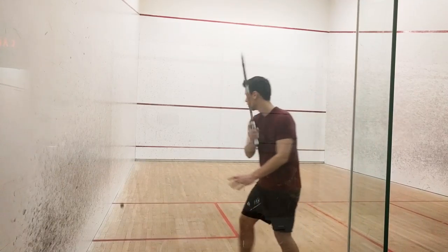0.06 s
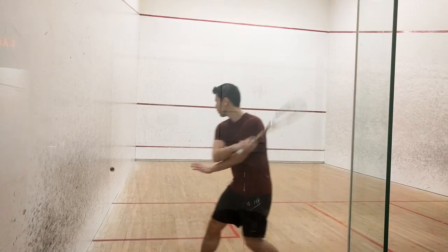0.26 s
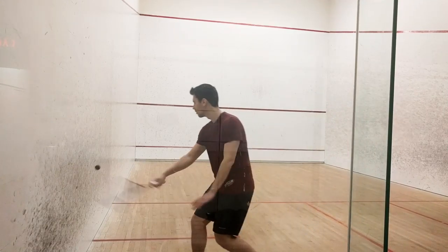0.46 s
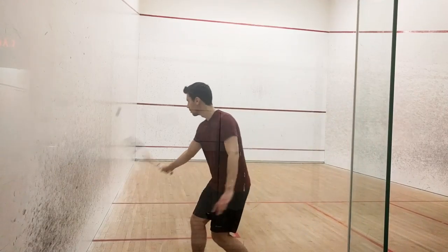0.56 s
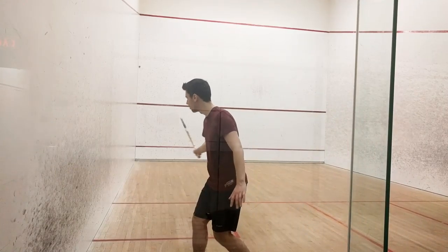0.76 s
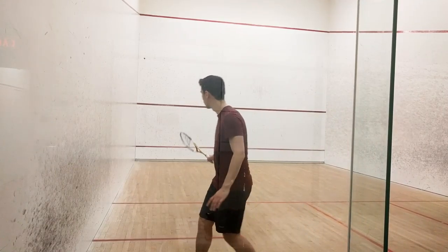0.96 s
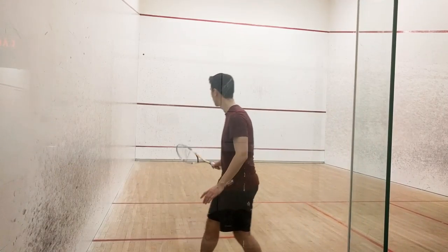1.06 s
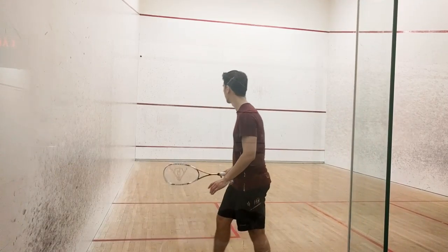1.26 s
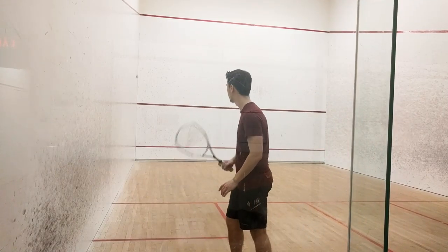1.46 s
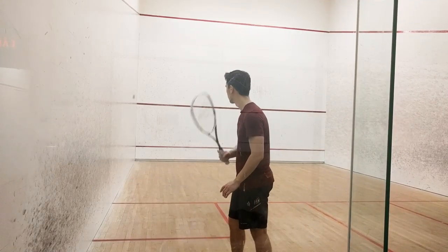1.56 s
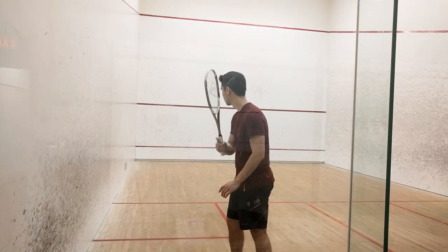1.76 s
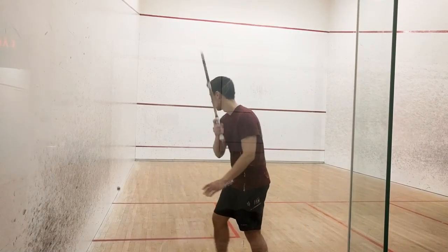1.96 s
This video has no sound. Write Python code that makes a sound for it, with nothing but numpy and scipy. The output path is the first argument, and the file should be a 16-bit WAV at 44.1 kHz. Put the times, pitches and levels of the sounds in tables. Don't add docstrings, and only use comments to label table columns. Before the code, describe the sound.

Squash ball hits in a bare closed court: floor bounce, racket crack, loud wall smack, ringing echoes

```python
import sys
import numpy as np
from scipy import signal
from scipy.fft import rfft, irfft
from scipy.io import wavfile

SR = 44100
rng = np.random.default_rng(int(sys.argv[2]) if len(sys.argv) > 2 else 0)


def put_to_file(sound):
    columns = np.atleast_2d(sound).T
    safe = np.clip(columns, -1, 1)
    whole_steps = np.round(safe * 32767)
    wavfile.write(sys.argv[1], SR, whole_steps.astype(np.int16))


def invert_db(level):
    return 10 ** (np.asarray(level, dtype=float) / 20)


N = 88200
COURT_TOP_HZ = 15750

# (pitch [Hz], level [dB], time to fade by 60 dB [s])
FLOOR_THUMP = [(183, 6, 0.029), (450, -18, 0.037), (740, -4, 0.0089), (1330, -6, 0.03)]
# modes (pitch [Hz], level [dB], time to fade by 60 dB [s]),
# then scrape length [s], scrape level [dB], scrape top [Hz], rattle fade by 60 dB [s], rattle level [dB]
SOLE_SNAP = ([(1020, -12, .01), (1920, -18, 0.0088), (3240, -5, 0.026), (4650, -19, .01)],
              0.001, -14, 3000, .02, -28)


def level(x, db):
    return x * invert_db(db) / np.sqrt(np.mean(x ** 2))


def table(points, hz):
    p = np.array(points, float)
    return np.interp(np.log(np.maximum(hz, 1)), np.log(p[:, 0]), p[:, 1])


def colour(x, gain):
    return irfft(rfft(x) * gain(np.fft.rfftfreq(len(x), 1 / SR)), len(x))


def dull(x, top_hz):
    return signal.lfilter(*signal.butter(2, min(top_hz, .45 * SR), fs=SR), x)


def flutter(t):
    patch_db, patches_per_s = 3, 70
    wobble = np.interp(t * patches_per_s, np.arange(400), rng.standard_normal(400))
    return invert_db(patch_db * wobble - .5)


def ring(modes, detune, wave):
    t = np.arange(SR // 10) / SR
    y = 0
    for (hz, db, t60), d in zip(modes, detune):
        y = y - invert_db(db - 60 * t / t60) * wave(2 * np.pi * hz * d * t)
    return y / np.abs(y).max()


def impact(arrivals, body, crack):
    push_s, crack_rise_s = .0008, 0.00011
    echo_blur, echo_top_hz = 1.98, 13300
    modes, scrape_s, scrape_db, top_hz, rattle_t60, rattle_db = crack
    out = np.zeros(N + SR)
    t = np.arange(SR // 10) / SR
    for k, (s, thump_db, crack_db) in enumerate(arrivals):
        is_echo = k > 0
        blur = echo_blur if is_echo else 1
        detune = 1 + 0.012 * is_echo * rng.standard_normal(12)

        push = np.sin(np.pi * np.clip(t[:441] / (push_s * blur), 0, 1)) ** 2
        thump = np.convolve(ring(body, detune, np.cos), push / push.sum())[:len(t)]

        scrape = invert_db(scrape_db) * np.exp(-(t / (scrape_s * blur) - 1) ** 2) * (t > 0)
        rattle = invert_db(rattle_db - 60 * t / rattle_t60)
        noise = dull(rng.standard_normal(len(t)), top_hz) * (scrape + rattle)
        tones = ring(modes, detune[4:], np.sin) * (1 - np.exp(-t / crack_rise_s)) / blur
        snap = tones + noise
        if is_echo:
            snap = dull(snap, echo_top_hz)

        i = int((s - push_s * blur / 2) * SR)
        j = int((s - scrape_s) * SR)
        out[i:i + len(t)] += invert_db(thump_db) * thump
        out[j:j + len(t)] += invert_db(crack_db) * snap
    return out[:N]


def floor_bounce():
    # (time [s], thump level [dB], crack level [dB])
    arrivals = [(.1168, -14, -23.5), (.1179, -18.5, -36), (.1318, -19, -38), (.152, -36, -37),
                (.1635, -26, -39), (.1705, -23, -47), (.1795, -18, -42), (.1925, -19.5, -43),
                (.2015, -37, -58), (.215, -30, -37), (.229, -25, -48), (.253, -41, -41), (.277, -37, -46)]
    # [Hz, dB, s]
    snap = ([(1140, -8, 0.0077), (1640, 2, 0.0047), (3070, -25, .004), (4140, -3, 0.0043),
             (8550, -10, 0.0064), (12000, -8, .004), (14900, -10, 0.0038)], 0.0008, -7, 4900, 0.059, -19)
    return impact(arrivals, FLOOR_THUMP, snap)


def floor_nick():
    # (time [s], thump level [dB], crack level [dB])
    arrivals = [
        (.1412, -36, -24.5),
    ]
    # [Hz, dB, s]
    snap = ([(2160, 11.5, 0.0078), (2960, -2, 0.0056), (4880, 2, 0.0079), (8000, -8, 0.0036),
             (12500, -15, .003)], 0.00041, -17, 10000, 0.0099, -18)
    return impact(arrivals, FLOOR_THUMP, snap)


def back_wall_touch():
    # (time [s], thump level [dB], crack level [dB])
    arrivals = [
        (.3964, -25.5, -47),
        (.404, -29, -54),
        (.4235, -20, -61),
    ]
    # (pitch [Hz], level [dB], time to fade by 60 dB [s])
    body = [(296, -8, 0.013), (660, -6, 0.017), (1010, -1, 0.025)]
    return impact(arrivals, body, SOLE_SNAP)


def racket_drive():
    # (time [s], thump level [dB], crack level [dB])
    arrivals = [(.6296, -11.5, -29), (.6365, -45, -38), (.6525, -17.5, -37.5), (.657, -22, -43),
                (.671, -43, -41), (.677, -42, -43), (.683, -35, -44), (.6925, -16, -45), (.698, -36, -38),
                (.7035, -38, -46), (.7155, -30, -47), (.745, -37, -47), (.758, -34, -49),
                (.788, -52, -54.5), (.821, -43, -53), (.908, -30, -57)]
    # (pitch [Hz], level [dB], time to fade by 60 dB [s])
    body = [(300, -1.5, 0.025), (1000, -7.5, 0.04), (1300, -11, 0.035), (1610, -11.5, 0.013)]
    # [Hz, dB, s]
    snap = ([(3360, -10, 0.0049), (4900, 7, 0.009), (5830, -10, 0.011), (8800, 4, 0.01), (9550, -15, .006),
             (13500, -1, 0.0092)], 0.0009, -14.5, 10800, 0.04, -2.5)
    return impact(arrivals, body, snap)


def front_wall_smack():
    # (time [s], thump level [dB], crack level [dB])
    arrivals = [(1.0768, -6.5, -7.5), (1.0845, -34, -13), (1.0855, -10, -23), (1.0925, -27, -38),
                (1.0985, -14, -11), (1.1012, -29, -17.5), (1.1065, -29, -30), (1.1135, -32, -34),
                (1.1162, -11.5, -19), (1.1315, -26, -16.5), (1.134, -13.5, -42), (1.143, -12, -42),
                (1.1465, -20, -24), (1.153, -37, -25), (1.161, -34, -34), (1.165, -33, -17),
                (1.1365, -23, -30), (1.1575, -26, -22), (1.2075, -21, -30), (1.255, -11.5, -29),
                (1.27, -24, -29)]
    # (pitch [Hz], level [dB], time to fade by 60 dB [s])
    body = [(387, 12, 0.0093), (640, -10, 0.006), (1280, -20, 0.025)]
    # [Hz, dB, s]
    snap = ([(2800, 15.5, 0.0026), (3170, 6, 0.0053), (4550, 12.5, 0.0054), (8100, 0, 0.0086),
             (11100, 1, 0.0043), (12800, 3, 0.0044), (15200, -1, 0.0053)], 0.00028, -13.5, 5400, 0.048, -17)
    return impact(arrivals, body, snap)


def floor_landing():
    # (time [s], thump level [dB], crack level [dB])
    arrivals = [
        (1.9836, -16.5, -19.5),
        (1.996, -36, -50),
        (1.9995, -32, -38),
    ]
    # (pitch [Hz], level [dB], time to fade by 60 dB [s])
    body = [(137, -11, 0.04), (274, -12, 0.025), (1200, -3, 0.015)]
    # [Hz, dB, s]
    snap = ([(2460, 4, 0.0045), (4450, -2, 0.0096), (5600, -4, 0.0081), (7500, -3, .005),
             (8550, -3, 0.0064), (11900, -3, .004)], .0005, -31, 10000, 0.016, -16)
    return impact(arrivals, body, snap)


def shoe_steps():
    # (time [s], thump level [dB], crack level [dB])
    arrivals = [
        (.4005, -28, -70),
        (.4525, -25, -60),
        (1.9665, -23.5, -70),
        (1.9735, -16.5, -31),
    ]
    # (pitch [Hz], level [dB], time to fade by 60 dB [s])
    body = [(136, 4, 0.016), (263, -23, 0.005), (455, -9, 0.09)]
    return impact(arrivals, body, SOLE_SNAP)


def footfalls():
    # (start time [s], level [dB], pitch [Hz], time to fade by 60 dB [s])
    sways = [
        (.452, -36, 20, .15),
        (1.965, -38, 35, .2),
        (1.082, -32, 115, .3),
    ]
    out = 0
    for s, db, hz, t60 in sways:
        age = np.maximum(np.arange(N) / SR - s, 0)
        out = out + invert_db(db - 60 * age / t60) * np.sin(2 * np.pi * hz * age)
    return out


def court(start_s, db, build_s, age_s, wait_s, feed, peaks):
    # (pitch [Hz], time to fade by 60 dB [s])
    fade_times = [(60, 1.28), (200, 1.19), (400, 2.61), (1000, 2.21), (2500, 2.19), (5000, 1.78),
                  (9000, 0.81), (16000, 0.68)]
    reflections_per_s3, scatter_db = 18000000, 6
    treble_hz = 2570
    bloom_s, bloom_width_s, bloom_db = 0.066, 0.024, 3.5
    t = np.arange(N + SR) / SR

    share = np.clip(reflections_per_s3 * (t + 0.0019) ** 2 / SR, 1e-4, 1)
    present = rng.random(len(t)) < share
    strength = rng.standard_normal(len(t))
    scatter = invert_db(scatter_db * rng.standard_normal(len(t)) * (1 - share))
    hits = present * strength * scatter / np.sqrt(share)

    hz = np.fft.rfftfreq(len(t), 1 / SR)
    gain = invert_db(table(feed, hz)) / (1 + (55 / np.maximum(hz, 1)) ** 2) * (hz < COURT_TOP_HZ)
    spectrum = rfft(hits) * gain / np.sqrt(np.mean(gain ** 2))

    swell = 1 - np.exp(-t / build_s)
    late = 1 - np.exp(-(t / wait_s) ** 3)
    late = late * invert_db(bloom_db * np.exp(-((t - bloom_s) / bloom_width_s) ** 2))
    y = 0
    for centre in 30 * 2 ** np.arange(0, 10, .5):
        treble = centre / (centre + treble_hz)
        band = np.clip(1 - 2 * np.abs(np.log2(np.maximum(hz, 1) / centre)), 0, 1)
        fade = invert_db(-60 * (t - age_s) / table(fade_times, centre))
        y = y + irfft(spectrum * band, len(t)) * flutter(t) ** treble * fade * swell * late ** treble
    for p_hz, width, p_db, t60 in peaks:
        treble = p_hz / (p_hz + treble_hz)
        tone = irfft(spectrum * invert_db(p_db) * np.exp(-((hz - p_hz) / width) ** 2), len(t))
        fade = invert_db(-60 * (t - age_s) / t60)
        y = y + tone * flutter(t) ** 2 * fade * swell * late ** treble

    i = int(start_s * SR)
    if i < 0:
        y = y[-i:N - i]
    else:
        y = np.concatenate([np.zeros(i), y[:N - i]])
    return invert_db(db) * y


def court_echoes():
    # (start [s], level [dB], build-up [s], age where level and colour hold [s], treble wait [s])
    echoes = [
        (-.45, -47, .05, 0.33, .02),
        (.119, -35, 0.0083, 0.056, 0.049),
        (0.401, -45, 0.01, 0.037, 0.017),
        (.632, -37, 0.0033, 0.045, 0.047),
        (1.079, -27.5, 0.013, 0.1, 0.031),
        (1.975, -24.5, 0.035, 0.033, 0.021),
    ]
    # (pitch [Hz], level [dB per Hz])
    earlier_feed = [(130, -12), (400, 0), (800, -6.5), (1200, 0), (2000, -13.5), (4500, -26), (7000, -35),
                    (15000, -34)]
    # (pitch [Hz], level [dB per Hz])
    bounce_feed = [(90, -2.5), (225, 2), (500, -18.5), (800, -21.5), (1250, -15), (2200, -25.5),
                   (4800, -32), (15000, -55)]
    # (pitch [Hz], level [dB per Hz])
    touch_feed = [(90, -15), (230, 0.5), (500, -22.5), (800, -14), (1250, -17), (2500, -32.5), (5000, -44),
                  (15000, -65)]
    # (pitch [Hz], level [dB per Hz])
    drive_feed = [(120, -6), (400, 1), (750, -15), (1250, -5), (1900, -20.5), (4300, -22), (8000, -30),
                  (15000, -40)]
    # (pitch [Hz], level [dB per Hz])
    smack_feed = [(90, -4), (200, -2.5), (340, -1), (750, -13), (1200, -9), (2000, -18.5), (4800, -27.5),
                  (15000, -56)]
    # (pitch [Hz], width [Hz], level [dB], time to fade by 60 dB [s])
    strings = [(1315, 78, -2.5, 2.4), (2370, 65, 4.5, 2.1), (4430, 460, 0.5, 0.6), (8000, 520, 7, 0.73)]
    feeds = [earlier_feed, bounce_feed, touch_feed, drive_feed, smack_feed, bounce_feed]
    peaks = [[], [], [], strings, [], []]
    return sum(court(*row, feed, tones) for row, feed, tones in zip(echoes, feeds, peaks))


def brushes():
    # (centre time [s], rise [s], fall [s], centre pitch [Hz], level [dB])
    rustles = [(.04, 0.0027, .006, 6000, -72), (.052, 0.0015, .003, 9500, -72),
               (.622, 0.048, .008, 12000, -78), (.665, 0.0087, 0.044, 13000, -61),
               (1.495, .03, 0.018, 13000, -71), (1.65, .03, 0.018, 8000, -85),
               (1.961, 0.012, 0.0052, 8000, -78), (.05, 0.05, 0.03, 50, -55),
               (.47, 0.057, 0.029, 25.1, -45.5), (.59, 0.026, 0.034, 24.9, -40.5),
               (1.27, 0.036, .04, 70, -62), (1.63, 0.026, 0.013, 70, -52)]
    t = np.arange(N) / SR
    out = 0
    for s, rise, fall, hz, db in rustles:
        def hump(f):
            octaves = np.log2(np.maximum(f, 1) / hz)
            return np.exp(-(octaves / 0.49) ** 2) * (f < COURT_TOP_HZ)

        shape = np.exp(-((t - s) / np.where(t < s, rise, fall)) ** 2)
        grain = rng.standard_normal(N) * invert_db(2.7 * rng.standard_normal(N))
        out = out + shape * level(colour(grain, hump), db)
    return out


def hall():
    # (pitch [Hz], level [dB])
    hush_colour = [(30, 6), (60, -25), (120, -14.5), (300, -20), (1200, -44), (3000, -55), (6000, -53),
                   (16000, -53)]
    rumble_hz = 15.6
    hush = colour(rng.standard_normal(N), lambda f: invert_db(table(hush_colour, f)) * (f < COURT_TOP_HZ))
    rumble = colour(rng.standard_normal(N), lambda f: f / (f + 4) / (1 + (f / rumble_hz) ** 4))
    return level(hush, -51) + level(rumble, -48.5)


def scene():
    ball = floor_bounce() + floor_nick() + back_wall_touch() + racket_drive()
    ball = ball + front_wall_smack() + floor_landing()
    feet = shoe_steps() + footfalls()
    return (ball + feet + court_echoes() + brushes() + hall())[None]


def band_limit(x):
    return signal.sosfilt(signal.butter(12, 16510, fs=SR, output="sos"), x)


def record(dry):
    top_cut = signal.ellip(6, .2, 50, 16100, fs=SR, output="sos")
    mix = signal.sosfilt(top_cut, dry)
    return band_limit(mix)


dry = scene()
out = record(dry)
put_to_file(out)
```